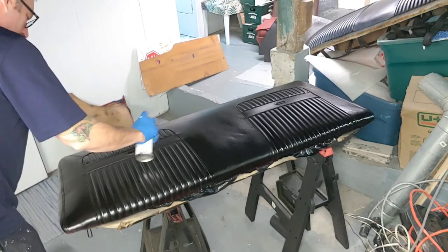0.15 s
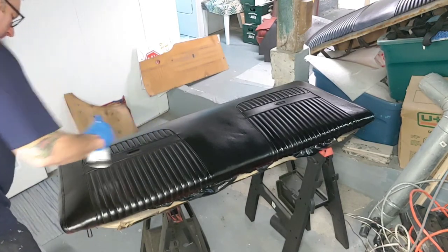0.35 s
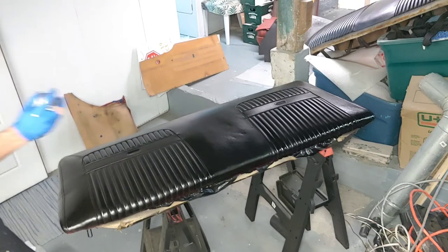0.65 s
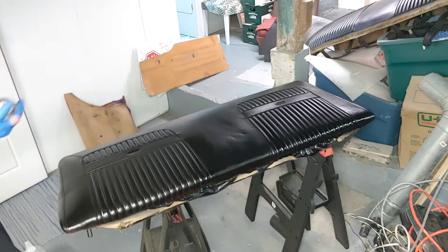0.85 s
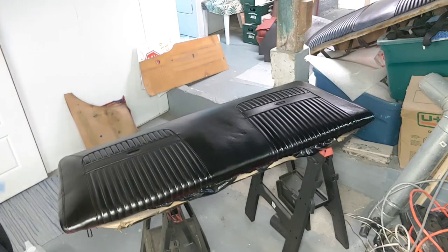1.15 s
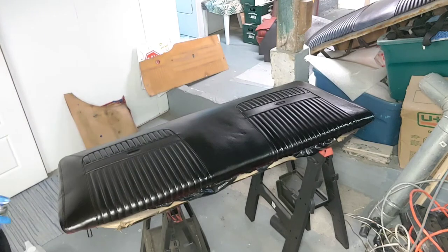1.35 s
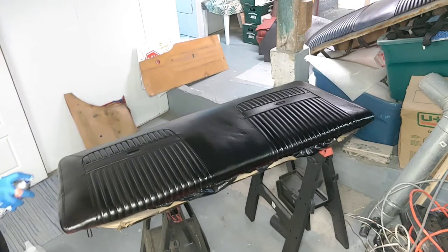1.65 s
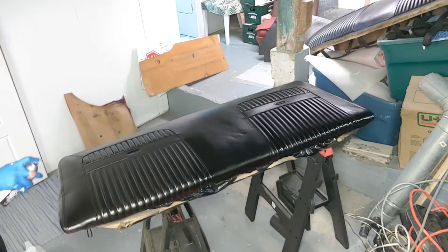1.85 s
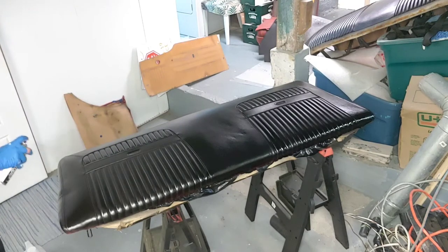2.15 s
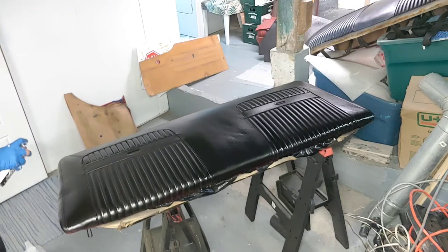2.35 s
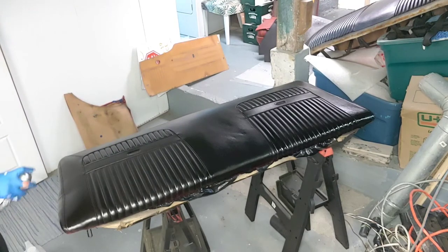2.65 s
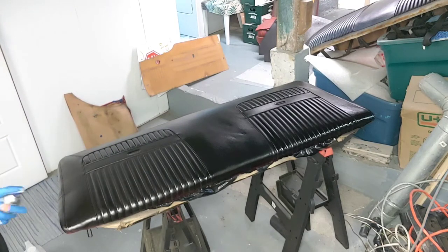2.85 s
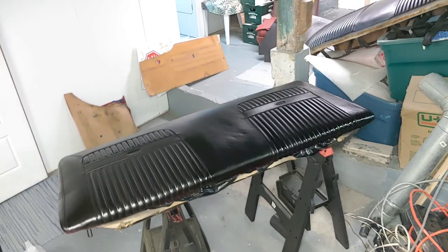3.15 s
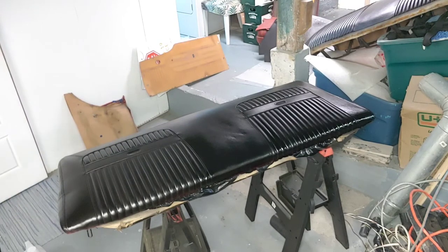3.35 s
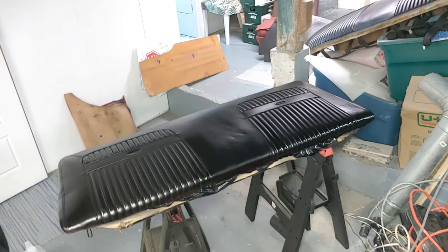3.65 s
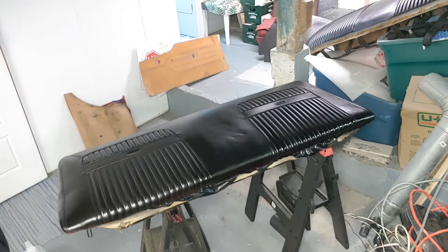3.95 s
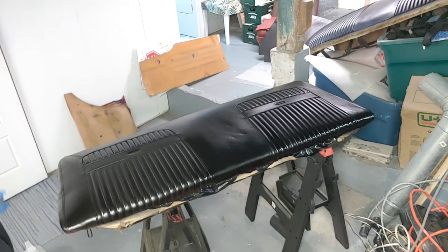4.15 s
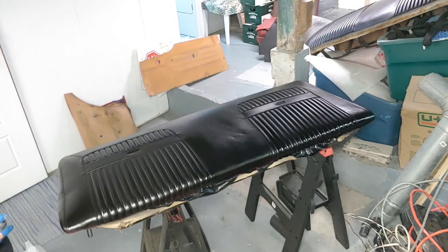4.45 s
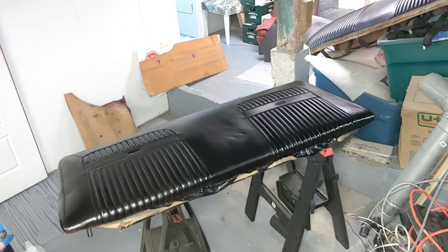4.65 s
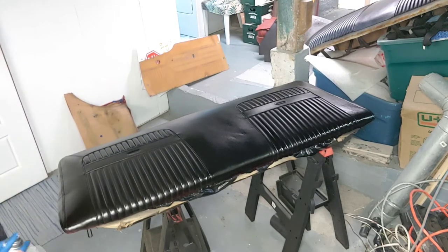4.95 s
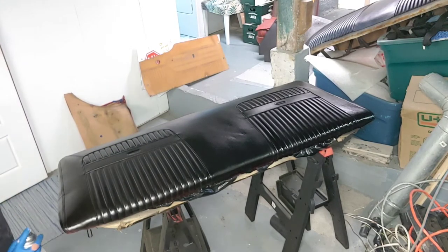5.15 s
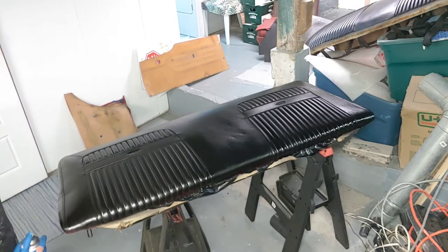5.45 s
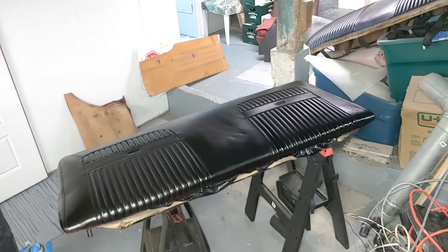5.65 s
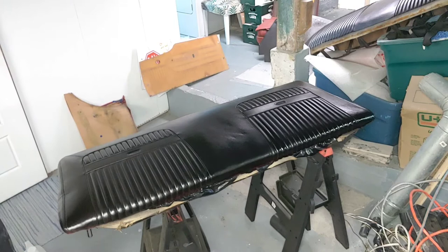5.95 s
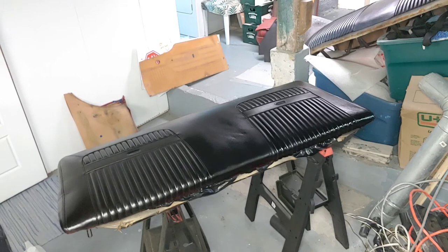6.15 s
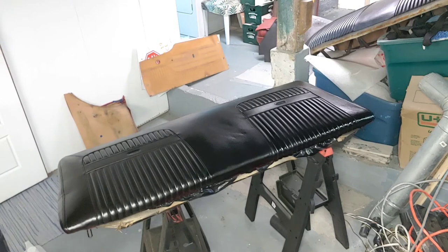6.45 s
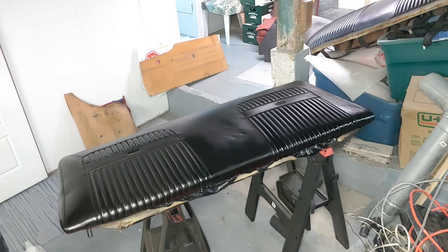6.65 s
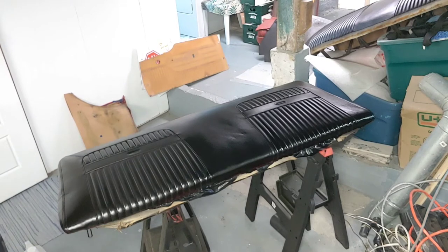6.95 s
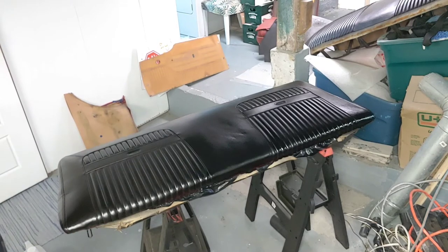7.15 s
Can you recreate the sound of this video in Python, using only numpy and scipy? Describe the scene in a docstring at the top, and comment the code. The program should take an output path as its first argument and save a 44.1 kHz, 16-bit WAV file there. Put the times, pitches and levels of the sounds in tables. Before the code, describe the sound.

Close to the microphones, bright airy aerosol bursts alternate with thin metallic clicking and rubbing of a gloved hand on the can. Short spray first, lively knocks, two sustained hisses, gentler handling and a faint floor scuff, near quiet, then three clipped sprays. The garage answers with a short, tight reverberation; low rumble and steady faint hiss lie beneath.

```python
"""Hissing bursts and longer passes of an aerosol paint can on a vinyl car seat in a cluttered garage.
Between them the can is handled: clicks, scrapes, soft rustles and a few dull scuffs of shoes.
Spray is shaped noise with a drifting seat echo; handling drives damped resonances; near walls answer.
A drifting, swelling rumble, mains hum and steady microphone hiss lie underneath."""
import sys
import numpy as np
from scipy import signal
from scipy.fft import rfft, irfft, next_fast_len
from scipy.io import wavfile
from scipy.ndimage import map_coordinates

SR = 44100
rng = np.random.default_rng(int(sys.argv[2]) if len(sys.argv) > 2 else 0)


def waveform_to_disk(signal):
    """Save audio, clipped to [-1, 1], as 16-bit WAV at the path in sys.argv[1]."""
    frames = np.transpose(np.atleast_2d(signal))
    scaled = np.clip(frames, -1, 1) * 32767
    samples = np.round(scaled).astype(np.int16)
    wavfile.write(sys.argv[1], SR, samples)


N = 322365

# Valve presses. Each row: start in seconds, length in seconds, first and last hiss level in relative dB,
# first and last seat rush level in relative dB, treble gain from 11 kHz up in dB.
PRESSES = [(-0.06, 0.07, -23.5, -30.5, -61, -52.5, -2), (0.18, .222, -36.5, -27.5, -64, -42, -4.5),
           (1.513, 0.68, -27.5, -28, -42.5, -57, -1.5), (2.371, 0.5, -34, -24.5, -69, -44.5, -1.5),
           (5.867, 0.19, -32, -29.5, -57.5, -51, 0), (6.271, 0.19, -33.5, -29.5, -59, -53.5, 1.5),
           (6.692, 0.19, -33, -30.5, -64.5, -52.5, 1.5)]
# Nozzle hiss spectrum. Each row: frequency in Hz, relative density in dB per Hz.
NOZZLE_SPECTRUM = [(700, -41), (1200, -37.5), (1800, -23), (2500, -15), (3500, -12.5), (4900, -7),
                   (5900, -6), (6700, -3), (7500, 2), (8300, -3.5), (9300, -8), (11500, -13.5),
                   (15800, -18)]
# Spectrum of the rush over the seat. Each row: frequency in Hz, relative density in dB per Hz.
SEAT_SPECTRUM = [(150, -31), (450, -16.5), (850, -12.5), (1250, -4), (1900, -7), (3200, -0.5), (7000, -31)]
VALVE_OPEN_S, VALVE_CLOSE_S = 0.011, 0.016
MID_PASS_DB = 3  # added to the hiss in the middle of a pass
FIRST_FLOW_DB, FINGER_S = -6.5, 0.022  # weak first flow; time constant of the finger sinking

# Knocks on the can. Each row: time in seconds, snap strength in relative dB, thud, shell and tick levels
# in dB against the snap, nominal shell resonance in Hz, slide length in seconds, slide level in relative dB.
KNOCKS = [(0.788, -36.5, -29, 1.5, 12, 1680, 0.15, -2), (0.9015, -16, -14, -6.5, 2, 1710, 0.079, -8.5),
          (1.0247, -30.5, -16, 0.5, 10.5, 1630, .14, -11.5),
          (1.1831, -12.5, -23, -8, -0.5, 1710, 0.057, -17.5), (1.2473, -28.5, -19, 0, 3, 1510, 0.03, -7.5),
          (1.289, -23, -28, 3, 6, 1620, 0.038, -7), (1.3526, -18, -11, -9, 1.5, 1700, .022, -13),
          (1.4197, -40.5, -20, -10, 19.5, 2000, .012, -23), (1.463, -47.5, -18, -5, 22.5, 1690, .01, -28),
          (1.5406, -28.5, -6.5, -8, 5.5, 1950, 0.073, -10), (1.735, -26, -47, -6, -6, 1700, 0.11, -10.5),
          (3.0285, -50.5, -22, -6.5, -14, 2000, 0.037, -10),
          (3.1821, -26, -16.5, -11.5, 0.5, 1840, 0.11, -4.5), (3.4175, -41, -14, 4, 5, 1244, 0.026, -7.5),
          (3.6685, -26, -6.5, -2.5, -13, 1690, 0.046, -12), (3.725, -34, 0, -4, 13, 1380, 0.064, -12),
          (3.7768, -38.5, 8.5, 4.5, -19, 1570, 0.016, -9.5),
          (3.856, -48.5, 7, 7.5, -23, 1310, 0.071, -12.5), (4.0104, -29, -26, -4, -1, 1410, .035, -24),
          (4.1004, -41, -7.5, -4, -16, 1610, 0.15, -13), (4.2108, -41, -9, -12, -25, 2400, .05, -6),
          (4.581, -37.5, -9.5, 1.5, 19.5, 1840, 0.026, -17), (4.766, -58.5, 8.5, 2, -4.5, 1700, 0.024, -11)]
# Glove rubs. Each row: start in seconds, length in seconds, snap strength in relative dB,
# thud, shell and tick levels in dB against the snap.
RUSTLES = [(0.463, 0.11, -54, -21, -9.5, -3), (0.649, .06, -56, -21.5, 0.5, 15.5),
           (0.699, 0.061, -47.5, -30, -6, 14.5), (2.944, 0.087, -50, -27, -8.5, -4),
           (3.115, 0.053, -53, -12, -3.5, 3), (3.319, 0.061, -64, 0, -2, 13),
           (3.624, 0.044, -57, 1, 0.5, 6.5), (3.981, 0.025, -52, 2, 0, 0), (4.551, 0.036, -53.5, 0, 1, 9),
           (5.714, 0.2, -61, -19, -18, -9), (6.986, 0.093, -54.5, -12.5, -8, -1.5)]
# Shoe scuffs. Each row: start in seconds, length in seconds, strength in relative dB.
SCUFFS = [(4.573, .045, -49), (4.662, 0.15, -55.5), (4.83, 0.085, -69)]
# Nominal resonances heard in the handling, three from the can and the tick brightened by the microphone:
# thud, shell, snap and tick in Hz.
HANDLING_HZ = [820, 1700, 4400, 7200]
# Widths of the four resonances in Hz.
WIDTHS_HZ = [450, 382, 1120, 1150]
# Weaker partner of each resonance. Each row: frequency ratio, level in dB against the main one.
OVERTONES = [(1.6, -5), (1.6, -10), (1.3, -3), (1.3, -18.5)]
# Ring of the thin steel wall. Each row: frequency in Hz, relative level in dB, decay by 60 dB in seconds.
STEEL_MODES = [(323.8, -4.5, .5), (469, 4, 0.48), (1830, -1.5, 0.4), (1960, -6, 0.3), (3760, -3, 0.55),
               (6906, -4.5, 0.446), (7410, 0.5, .45), (8037, 0, .45)]
# Softness of the contacts. Each row: frequency in Hz, gain in dB.
CONTACT_GAIN = [(60, -12.5), (190, -9), (320, -6), (1500, -2.5), (2200, 3), (3200, 0), (5000, -1),
                (7400, -3.5), (8600, -6), (10000, -7.5), (11500, -15), (13000, -22), (16000, -22.5)]
# Drive of the four resonances by a slide, in dB against a knock.
SLIDE_BALANCE_DB = [-2.5, 1.5, -2.5, 1.5]
# Scuff resonances in Hz.
SCUFF_HZ = [400, 1750, 3800, 7300]
# Their relative levels in dB.
SCUFF_BALANCE_DB = [0, -35, -18, -4.5]
GRIP_SHIFT = 0.042  # spread of the log frequency of each resonance from grip to grip
SLIDE_DELAY_S, SLIDE_RISE_S, SLIDE_FADE_DB_PER_S = 0.005, 0.0088, 38.5
RUSTLE_RISE_S, SCUFF_RISE_S = 0.02, 0.018

# Rumble spectrum. Each row: frequency in Hz, relative density in dB per Hz.
RUMBLE_SPECTRUM = [(12, -28.5), (24, 1.5), (45, 2.5), (77, -0.5), (142, -6.5), (177, -10.5), (248, -19.5),
                   (369, -16), (426, -27), (624, -32.5), (900, -48), (1980, -120)]
# Brief rumble swells. Each row: time in seconds, peak level in dB.
SWELLS = [(0.92, -58.5), (1.33, -55.5), (1.83, -60), (2.18, -56), (2.56, -54.5), (2.76, -59), (3.05, -65),
          (3.26, -61.5), (3.6, -66.5), (3.9, -64.5), (5.06, -68.5), (5.98, -59.5), (6.5, -62), (6.86, -66)]
# Left-right likeness of the rumble. Each row: frequency in Hz, correlation from 0 to 1.
LIKENESS = [(60, 1), (130, 0.93), (290, 1), (700, .1), (2000, 0.05)]
# Mains hum. Each row: frequency in Hz, mid level in dB.
HUM = [(59, -77), (120, -71.5), (239, -90)]
# Microphone hiss spectrum. Each row: frequency in Hz, relative density in dB per Hz.
MIC_SPECTRUM = [(290, -37.5), (500, -12), (586, -10), (631, -11), (868, -14.5), (1110, -13), (2770, -20.5),
                (7530, -15), (9770, -21.5), (16000, -26.5)]
SWELL_S = 0.076  # half-width at 1/e
RUMBLE_DB, RUMBLE_WANDER_DB = -69.5, 0.94  # level between swells; slow drift
TOP_HZ = 15950


def amp(db):
    """Decibels to gain."""
    return 10 ** (np.asarray(db) / 20)


def unit(x):
    """x at rms 1."""
    return x / np.sqrt(np.mean(x ** 2) + 1e-20)


def along(points, hz):
    """(Hz, value) points read on a log frequency axis."""
    f, v = np.transpose(points)
    return np.interp(np.log(hz + 1), np.log(f + 1), v)


def wobble(rate_hz, size):
    """Smooth random curve with rate_hz knots a second."""
    knots = rng.standard_normal(int(size * rate_hz / SR) + 4)
    return map_coordinates(knots, [np.arange(size) * rate_hz / SR])


def filtered(x, response):
    """x through a complex response of frequency."""
    size = x.shape[-1]
    m = next_fast_len(size + 8192)
    return irfft(rfft(x, m) * response(np.fft.rfftfreq(m, 1 / SR)), m)[..., :size]


def coloured(x, spectrum):
    """x shaped by a spectrum, at rms 1."""
    return unit(filtered(x, lambda hz: amp(along(spectrum, hz))))


def grainy(size, rate_hz, depth_db):
    """Noise in small random clumps, at rms 1."""
    return unit(rng.standard_normal(size) * amp(depth_db * wobble(rate_hz, size)))


def gate(t, length_s, rise_s, fall_s):
    """Envelope that swells from t = 0 and dies away after length_s."""
    return (1 - np.exp(-(t / rise_s) ** 2)) * np.exp(-np.maximum(t - length_s, 0) / fall_s)


def add(out, start_s, x):
    """Mix x into out from start_s on, cropped to the scene."""
    start = round(start_s * SR)
    part = x[:, max(-start, 0):N - start]
    out[:, max(start, 0):][:, :part.shape[1]] += part


def garage(t60_s, direct_db, near_db=-3, near_t60_s=0.039, lag_s=0.00025):
    """Stereo response of energy 1: direct path, sparse close reflections, diffuse wall reverberation."""
    t = np.arange(SR // 3) / SR
    decay = amp(-60 * t / max(t60_s, 0.02))
    walls = rng.standard_normal((2, len(t))) * decay * (1 - np.exp(-t / 0.0046))
    # cubing makes the noise spiky
    near = rng.standard_normal((2, len(t))) ** 3 * amp(-60 * t / near_t60_s)
    h = (unit(walls) + amp(near_db) * unit(near)) / np.sqrt(len(t))
    h[0, round(lag_s * SR)] += amp(direct_db)  # the left microphone is reached later
    h[1, 0] += amp(direct_db)
    return h / np.linalg.norm(h, axis=1, keepdims=True)


def spray():
    """A wide plume: two halves hiss independently and meet the walls along different paths."""
    out = np.zeros((2, N))
    for press in PRESSES:
        for _ in range(2):
            half = jet(press) / np.sqrt(2)
            add(out, press[0], signal.fftconvolve([half], garage(t60_s=0.12, direct_db=-3.5), axes=1))
    return out


def jet(press, hiss_db=1.0, rush_db=1, sputter_db=4.0, flutter_db=1.23,
        bounce_db=-13, bounce_s=0.000598, sway=0.25):
    """Gas and droplets hiss from the nozzle and rush unevenly over the seat while the valve is open."""
    _, length_s, first_hiss_db, last_hiss_db, first_rush_db, last_rush_db, treble_db = press
    t = np.arange(int((length_s + 0.15) * SR)) / SR
    way = np.minimum(t / length_s, 1)  # share of the pass done
    nozzle_db = first_hiss_db + (last_hiss_db - first_hiss_db) * way
    nozzle_db = nozzle_db + MID_PASS_DB * np.sin(np.pi * way)
    seat_db = first_rush_db + (last_rush_db - first_rush_db) * way
    seat_db = seat_db + sputter_db * wobble(41.06, len(t))

    noise = grainy(len(t), rate_hz=1900, depth_db=0.5)
    hiss = amp(nozzle_db + hiss_db) * coloured(noise, NOZZLE_SPECTRUM)
    hiss = filtered(hiss, lambda hz: amp(along([(8000, 0.0013), (11000, treble_db)], hz)))
    # hand movement varies the delay of the seat echo, so notches drift through the hiss
    delay_s = bounce_s * np.exp(sway * wobble(4.1, len(t)))
    echo = amp(bounce_db) * np.interp(t - delay_s, t, hiss)
    rush = amp(seat_db + rush_db) * coloured(rng.standard_normal(len(t)), SEAT_SPECTRUM)

    flow_db = FIRST_FLOW_DB * np.exp(-t / FINGER_S) + flutter_db * wobble(45, len(t))
    valve = gate(t, length_s, VALVE_OPEN_S, VALVE_CLOSE_S)
    return (hiss + echo + rush) * valve * amp(flow_db)


def knocks(blow_db=-19.0, slide_db=1, ring_db=-35, contact_s=0.0003, longest_s=0.0014):
    """A blow on the can excites the resonances; the grip then slides on and drives them too."""
    out, t = np.zeros((2, N)), np.arange(SR // 3) / SR
    hardest_db = max(row[1] for row in KNOCKS)
    thud_hz, _, snap_hz, tick_hz = HANDLING_HZ
    for s, db, thud_db, shell_db, tick_db, shell_hz, length_s, drag_db in KNOCKS:
        levels_db = balance(db, thud_db, shell_db, tick_db)
        grip = np.exp(GRIP_SHIFT * rng.standard_normal(len(HANDLING_HZ)))
        centres_hz = grip * [thud_hz, shell_hz, snap_hz, tick_hz]

        # gentler blows take longer to land
        attack_s = min(contact_s * amp(hardest_db - levels_db.max()), longest_s)
        blow = garage(t60_s=0.2, direct_db=-12.5, near_db=-1.0, near_t60_s=0.051)
        blow = blow * (1 - np.exp(-t / attack_s))
        blow = blow / np.linalg.norm(blow, axis=1, keepdims=True) * np.sqrt(SR)
        struck = resonate(blow, levels_db + blow_db, centres_hz)
        add(out, s, struck + amp(levels_db.max() + ring_db) * steel_ring(t))

        slide = friction(length_s, SLIDE_RISE_S, SLIDE_FADE_DB_PER_S)
        slide_levels_db = levels_db + SLIDE_BALANCE_DB + drag_db + slide_db
        add(out, s + SLIDE_DELAY_S, resonate(slide, slide_levels_db, centres_hz))
    return out


def balance(db, thud_db, shell_db, tick_db):
    """Resonance levels: the snap carries the strength, the others are set against it."""
    return db + np.array([thud_db, shell_db, 0, tick_db])


def resonate(x, levels_db, centres_hz):
    """x drives four damped resonances, each with a weaker partner above it."""
    def mode(f, centre_hz, width_hz):
        damping = 1j * f * width_hz
        return damping / (centre_hz * centre_hz - f * f + damping)

    def response(f):
        total = 0
        for centre_hz, width_hz, (ratio, partner_db), db in zip(centres_hz, WIDTHS_HZ, OVERTONES, levels_db):
            pair = mode(f, centre_hz, width_hz) + amp(partner_db) * mode(f, centre_hz * ratio, width_hz)
            total = total + amp(db) * pair / np.sqrt(np.mean(abs(pair) ** 2))
        return total
    return filtered(x, response)


def steel_ring(t):
    """The thin wall rings on as decaying sines; moving paint blurs their phase."""
    slosh_rad = wobble(60, len(t))
    ring = np.zeros((2, len(t)))
    for hz, db, t60_s in STEEL_MODES:
        turns = hz * t + rng.random((2, 1))
        ring += amp(db - 60 * t / t60_s) * np.sin(2 * np.pi * turns + slosh_rad)
    return ring


def friction(length_s, rise_s, fade_db_per_s=0, catch_db=2.0):
    """Clumpy noise models a sliding contact that catches and slips in tiny steps, with garage reflections."""
    t = np.arange(int((length_s + 0.1) * SR)) / SR
    grains = grainy(len(t), rate_hz=770, depth_db=1.0)
    slips = unit(grains * amp(catch_db * wobble(135.5, len(t))))
    stroke = gate(t, length_s, rise_s, fall_s=1.6 * rise_s) * amp(-fade_db_per_s * t)
    return signal.fftconvolve([slips * stroke], garage(t60_s=0.1, direct_db=-4.5), axes=1)


def rustles(level_db=1):
    """The glove brushes along the can: soft friction drives the handling resonances."""
    out = np.zeros((2, N))
    for s, length_s, *colour_db in RUSTLES:
        rub = friction(length_s, RUSTLE_RISE_S)
        add(out, s, resonate(rub, balance(*colour_db) + level_db, HANDLING_HZ))
    return out


def scuffs(level_db=1):
    """Soles drag over the floor: the same friction with a low, dull colour."""
    out = np.zeros((2, N))
    for s, length_s, db in SCUFFS:
        drag = friction(length_s, SCUFF_RISE_S)
        add(out, s, resonate(drag, np.add(SCUFF_BALANCE_DB, db + level_db), SCUFF_HZ))
    return out


def rumble():
    """Low noise that drifts and swells, more alike in both channels at low frequencies."""
    def mid_side(hz):
        angle = np.arccos(np.clip(along(LIKENESS, hz), -1, 1)) / 2
        return np.array([np.cos(angle), np.sin(angle)])

    t = np.arange(N) / SR
    mid, side = filtered(rng.standard_normal((2, N)), mid_side)
    swells = sum(amp(db) * np.exp(-((t - s) / SWELL_S) ** 2) for s, db in SWELLS)
    strength = np.hypot(amp(RUMBLE_DB + RUMBLE_WANDER_DB * wobble(2.8, N)), swells)
    return strength * coloured(np.array([mid + side, mid - side]), RUMBLE_SPECTRUM)


def mains_hum():
    """Mains tones that share a slightly unsteady level and phase."""
    t = np.arange(N) / SR
    waver, drift_rad = amp(1.6 * wobble(12, N)), 0.5 * wobble(6, N)
    return waver * sum(amp(db) * unit(np.sin(2 * np.pi * hz * t + drift_rad)) for hz, db in HUM)


def microphone_hiss(level_db=-78.0):
    """Steady shaped noise, independent in each channel."""
    return amp(level_db) * coloured(rng.standard_normal((2, N)), MIC_SPECTRUM)


def scene(spray_right_db=2, handling_right_db=0.78):
    """Spray and handling lean to the right; each lean in dB raises the right and lowers the left."""
    def shade(hz):
        return amp(np.outer([-1, 1], along([(3000, 0.4), (6500, spray_right_db)], hz)))

    sprayed = filtered(spray(), shade)
    handling = knocks() + rustles() + scuffs()
    handling = filtered(handling, lambda hz: amp(along(CONTACT_GAIN, hz)))
    handling = handling * amp([[-handling_right_db], [handling_right_db]])
    return sprayed + handling + rumble() + mains_hum() + microphone_hiss()


def record(dry):
    """Soft-limits the highest peaks, then cuts steeply above TOP_HZ."""
    rounded = dry / (1 + (dry / 0.88) ** 6) ** (1 / 6)
    return filtered(rounded, lambda hz: 1 / np.sqrt(1 + np.minimum(hz / TOP_HZ, 1.2) ** 500))


dry = scene()
out = record(dry)
waveform_to_disk(out)
```